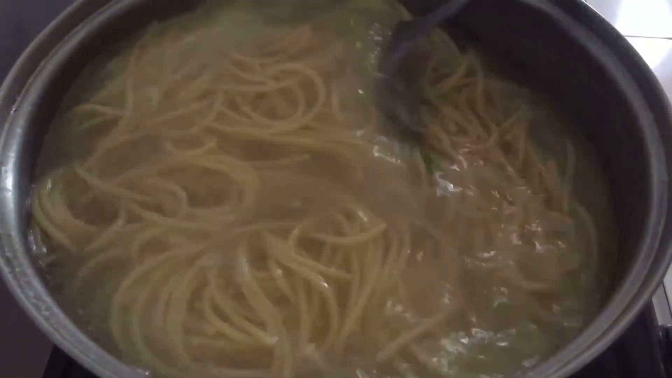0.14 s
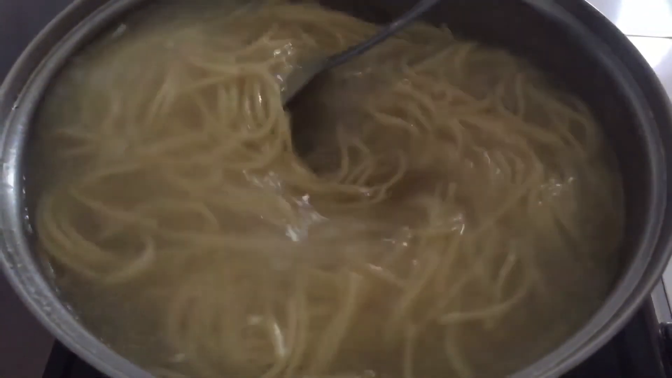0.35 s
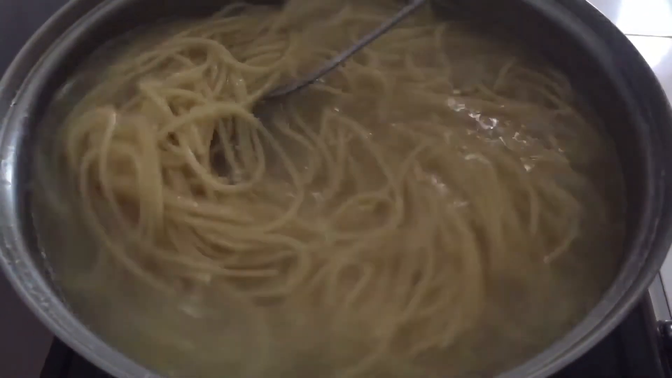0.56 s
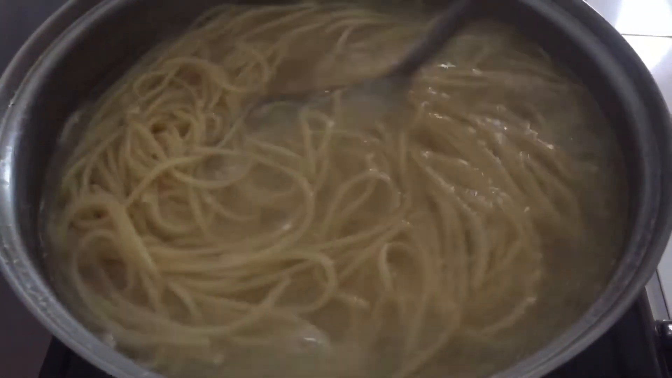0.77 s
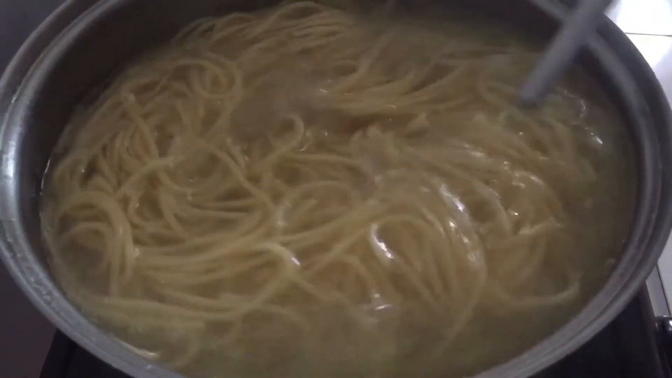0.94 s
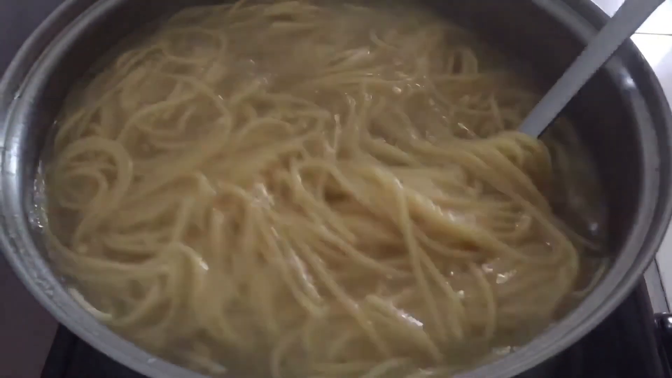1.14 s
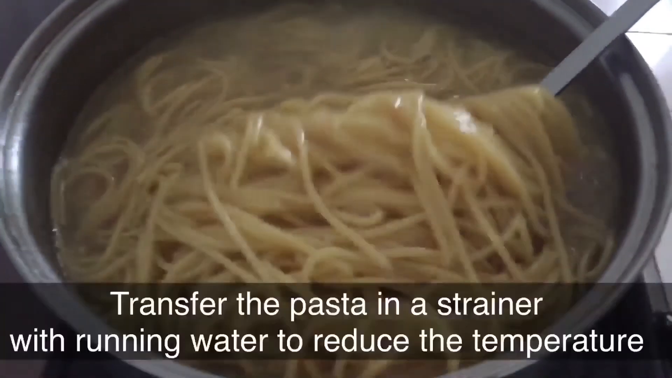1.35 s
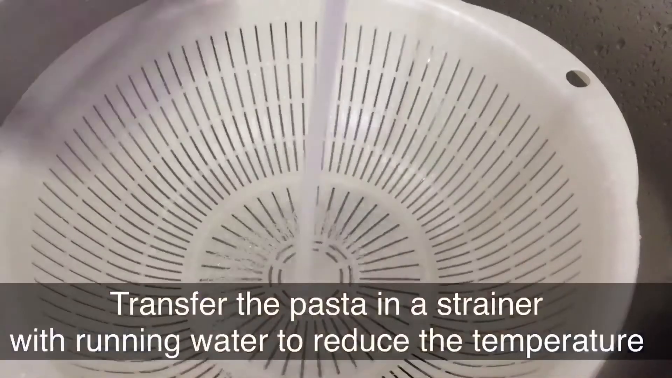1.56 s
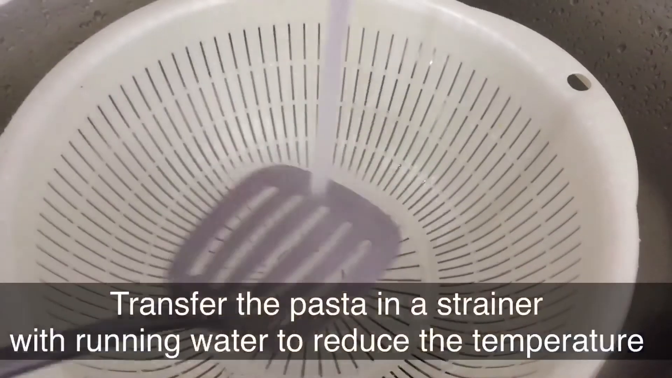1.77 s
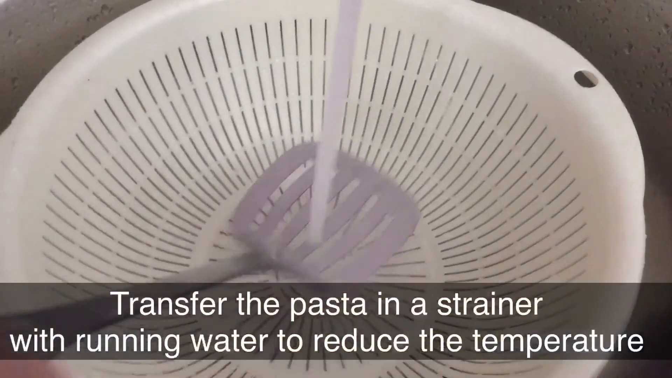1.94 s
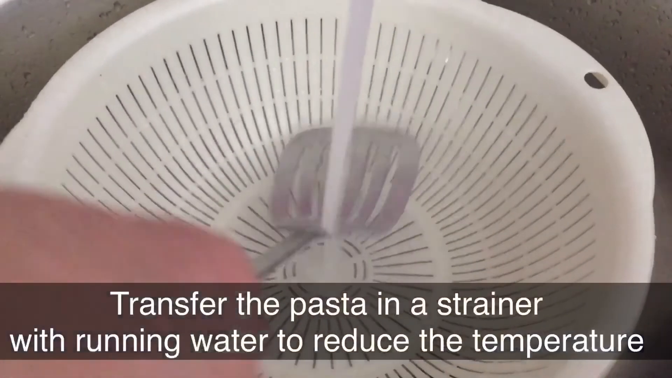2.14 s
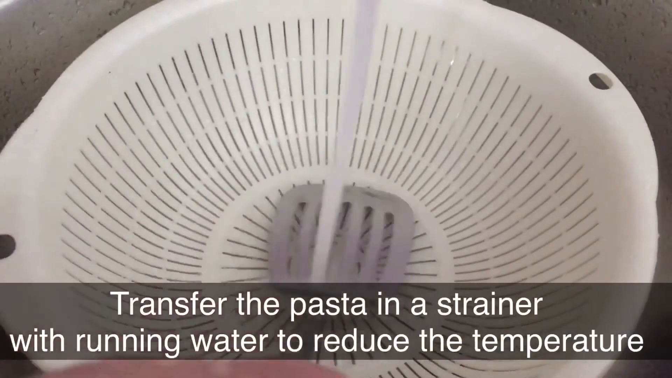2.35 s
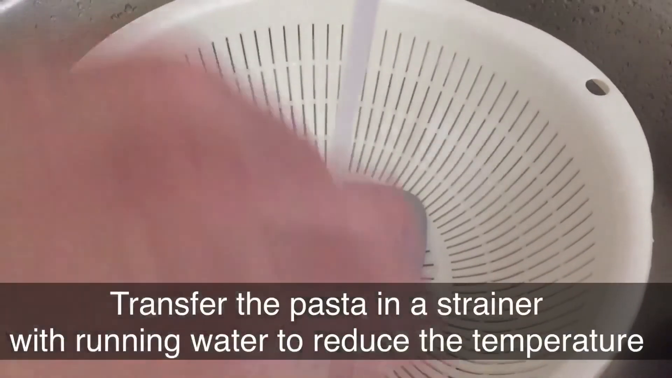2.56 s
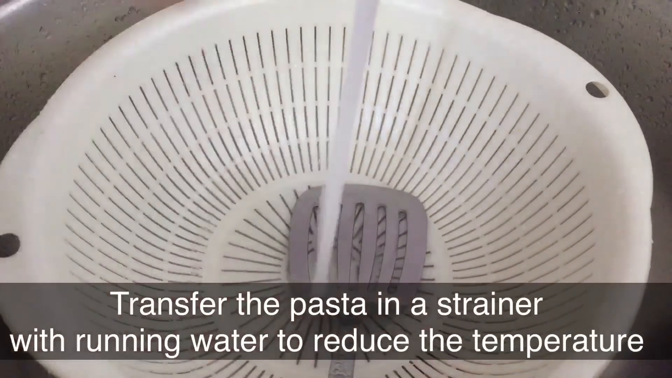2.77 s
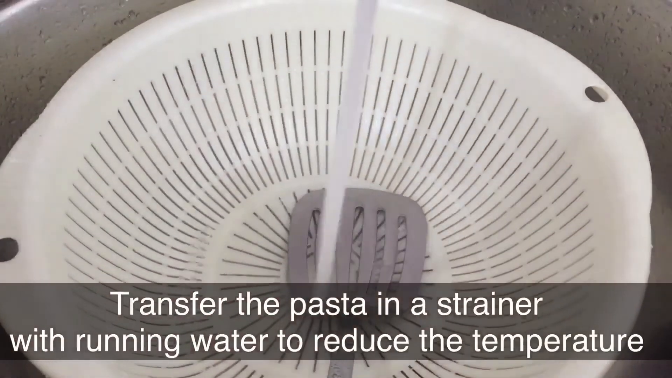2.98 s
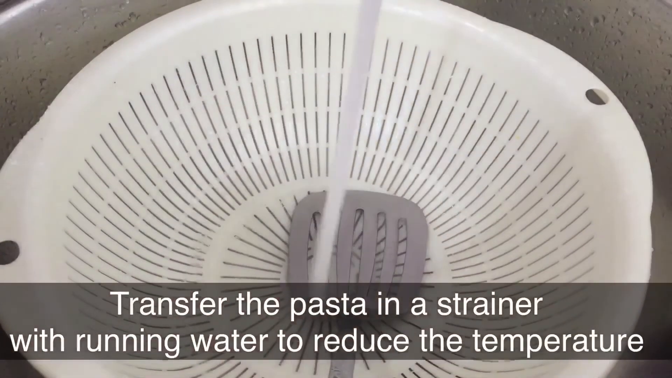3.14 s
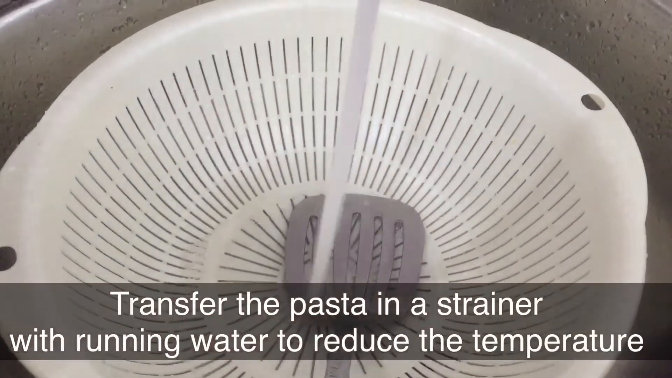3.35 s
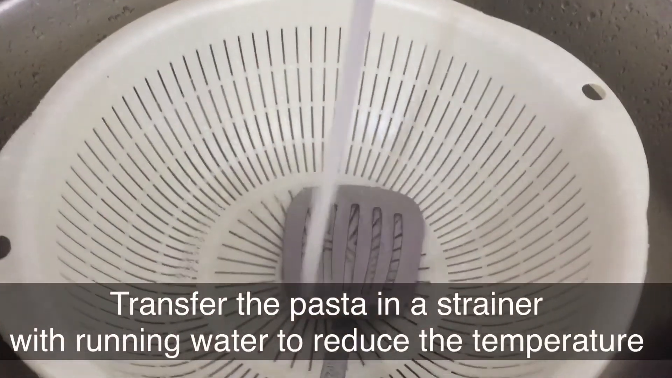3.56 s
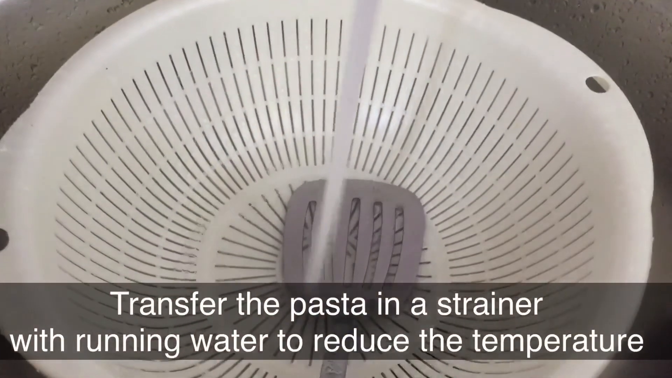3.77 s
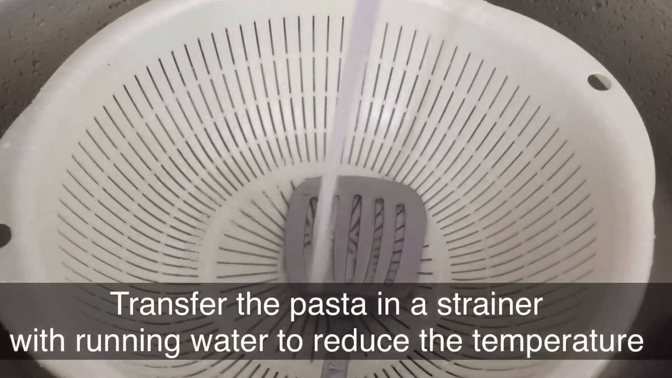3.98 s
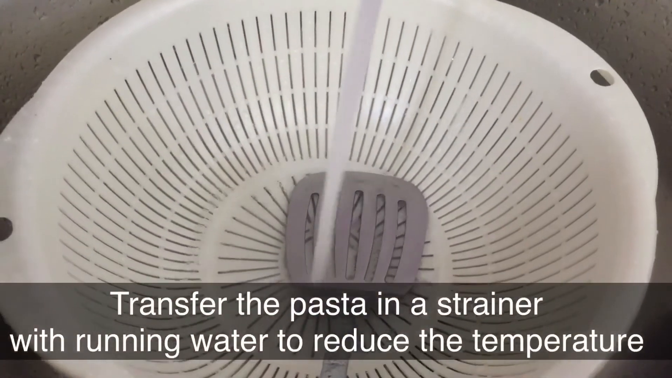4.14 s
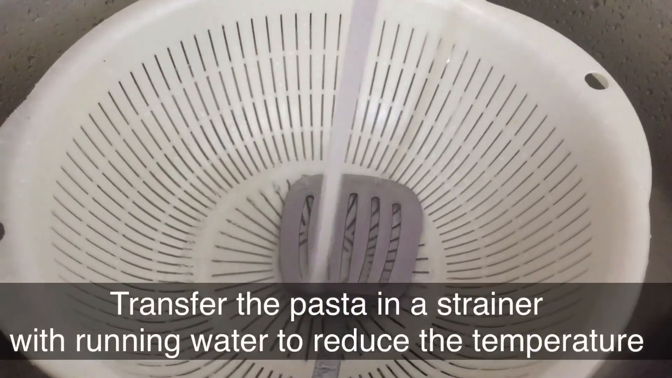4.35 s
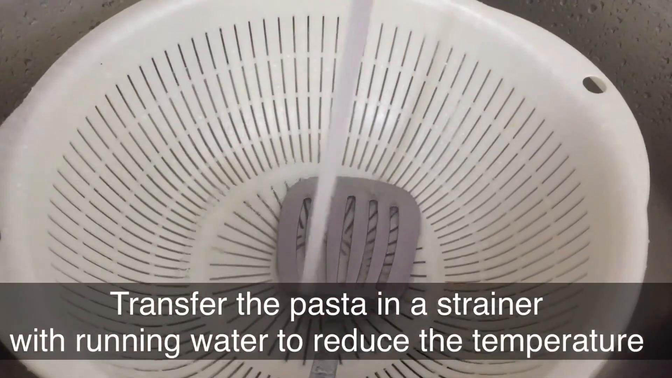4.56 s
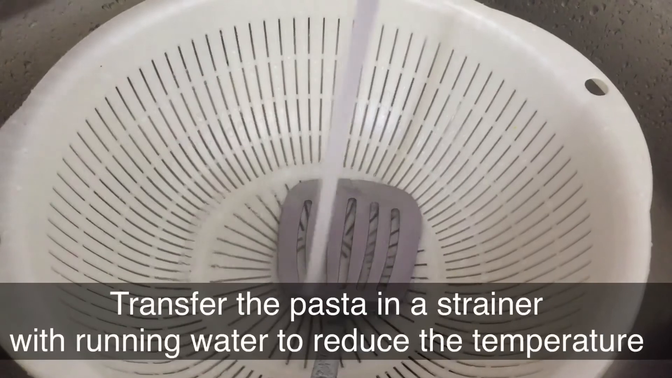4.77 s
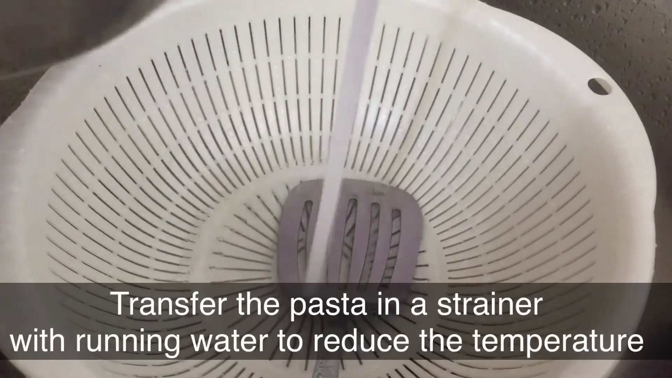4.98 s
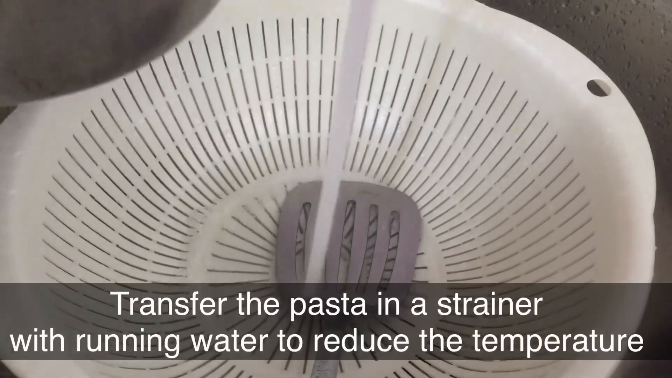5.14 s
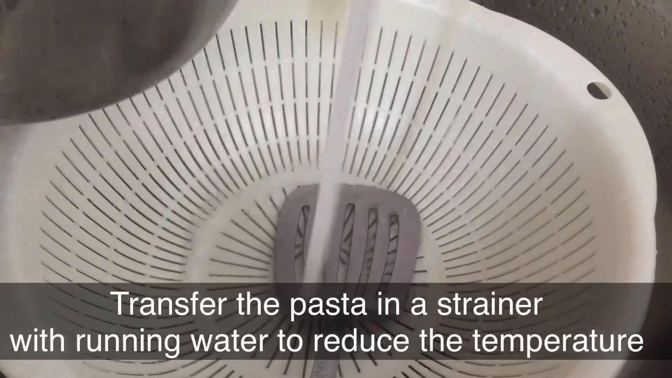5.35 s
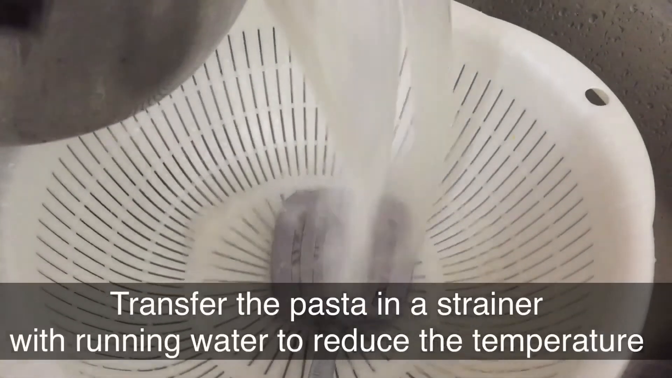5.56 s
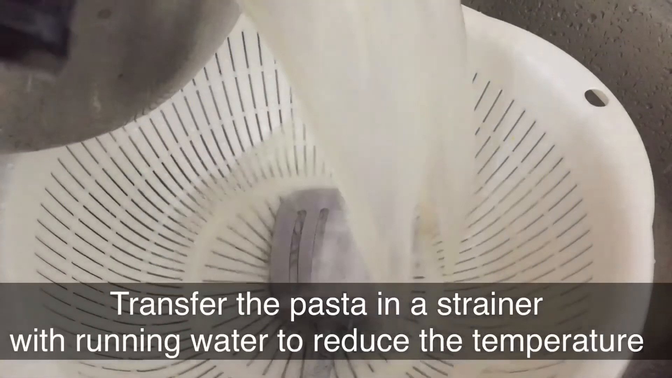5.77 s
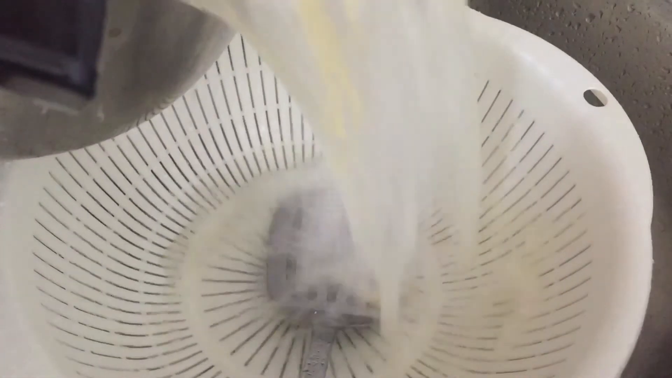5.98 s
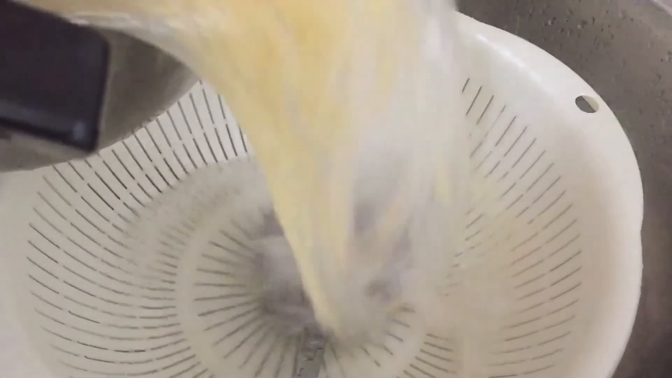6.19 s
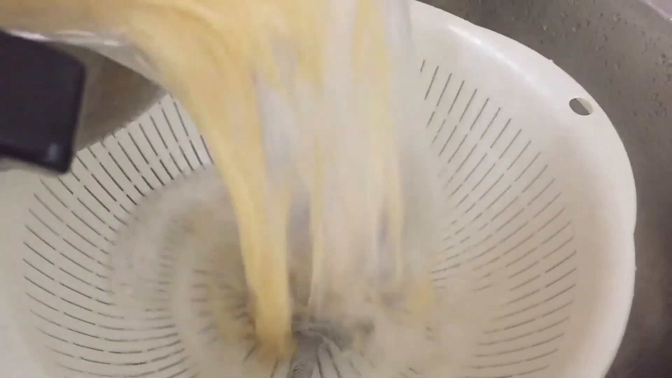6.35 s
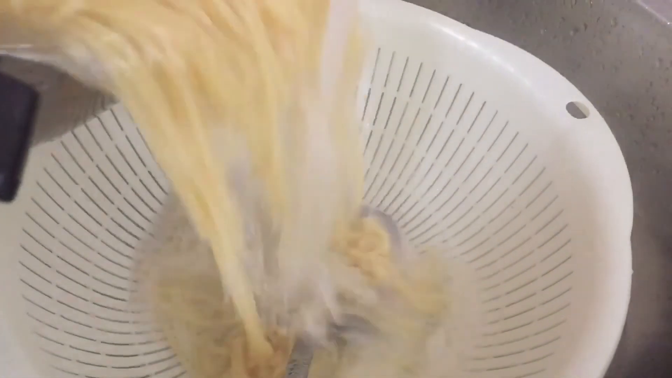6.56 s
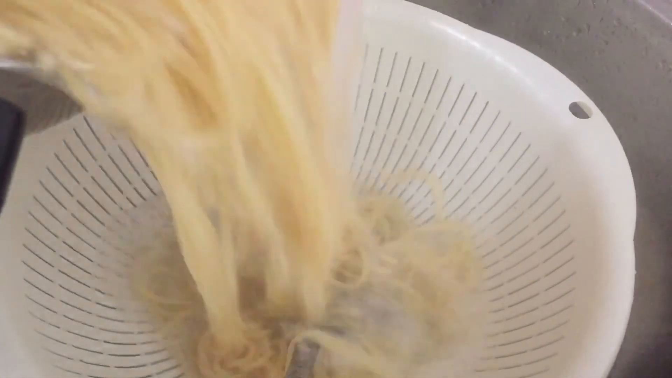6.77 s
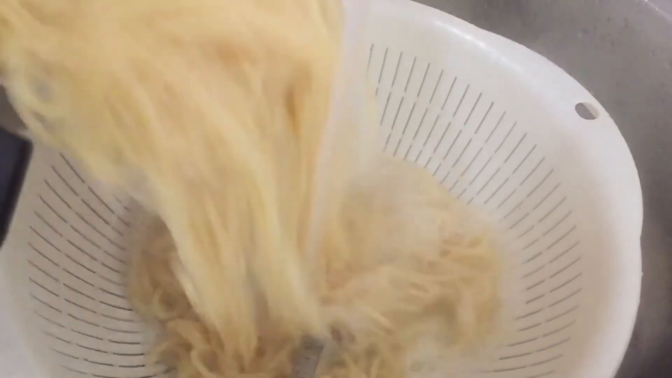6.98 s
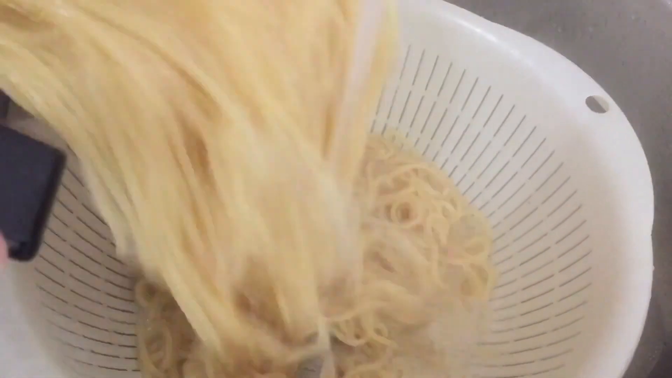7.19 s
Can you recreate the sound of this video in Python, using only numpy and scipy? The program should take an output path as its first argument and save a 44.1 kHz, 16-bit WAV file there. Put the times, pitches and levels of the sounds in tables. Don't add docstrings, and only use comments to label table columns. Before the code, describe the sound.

Soft pot stirring and drips give way to a bright running tap, a utensil clattering into a plastic strainer, then a heavy splashing pour.

```python
import sys
import numpy as np
from scipy import signal
from scipy.io import wavfile
from scipy.ndimage import uniform_filter1d

SR = 44100
rng = np.random.default_rng(int(sys.argv[2]) if len(sys.argv) > 2 else 0)


def inscribe(sig):
    pcm = np.round(np.clip(np.atleast_2d(sig).T, -1, 1) * 32767)
    wavfile.write(sys.argv[1], SR, pcm.astype(np.int16))


def invert_db(level):
    return 10 ** (np.asarray(level, dtype=float) / 20)


N = 318402
TIME = np.arange(N) / SR

# frequency_hz, density_db
STOVE_SPECTRUM = [(18, -69), (30, -17), (112, -13), (194, -9), (266, -22.5), (303, 36), (336, -17),
                  (394, -17.5), (526, -21), (569, -20.5), (1960, -31), (5040, -61), (5900, -25),
                  (6720, -49), (16000, -45.5)]
# frequency_hz, width_hz, level_db
HUM_RESONANCES = [(5960, 450, -66.5), (117.2, 5.1, -57), (304, 180, -53.5), (1490, 530, -59.5)]
# frequency_hz, level_db
FAN_TONES = [(301.5, -46.5), (387.6, -53.5)]
# start_s, end_s, frequency_hz, width_hz, level_db
STEAM_WHISTLES = [(0.038, .26, 2400, 130, -66), (0.56, 0.73, 3400, 130, -63), (1.24, 1.35, 3800, 150, -65),
                  (1.06, 1.1, 3700, 120, -68), (0.026, .3, 1600, 110, -72), (1.1, 2.1, 1300, 110, -64),
                  (1.3, 1.4, 1100, 76, -73), (0.42, 0.57, 2100, 200, -64), (.22, 0.37, 2300, 120, -60),
                  (.9, 1.3, 1800, 50, -81), (1.27, 1.42, 106, 17, -40)]
# start_s, level_db
STIRS = [
    (0, -60),
    (.225, -46.5),
    (.55, -74),
    (.72, -66),
    (.9, -58),
    (1.33, -54),
]
# start_s, peak_db, pitch_hz, ring_cycles
DRIPS = [(.121, -43, 624, 16), (.242, -35, 2400, 14), (.249, -32, 1500, 14), (.257, -30, 2700, 14),
         (.3085, -32, 5000, 20), (.45, -38, 805, 16), (.5, -38, 3300, 20), (.64, -45, 1410, 18),
         (.67, -42, 2300, 16), (.868, -37, 1960, 14), (1.029, -42, 1560, 18), (1.25, -50, 641, 16),
         (.2495, -31, 5200, 14), (.278, -38, 2480, 20), (0.3082, -19, 2470, 12), (0.309, -26, 1350, 21),
         (0.32, -27.5, 1120, 25), (.345, -33, 2100, 16), (.350, -26.5, 1720, 18), (0.371, -20.5, 3580, 11),
         (.437, -36, 4500, 15), (.468, -30, 2110, 28), (0.4805, -23, 3130, 29), (.585, -35.5, 2080, 33),
         (0.985, -28, 855, 29), (.986, -30, 2880, 15), (1.163, -37, 1900, 27), (1.166, -37, 1150, 18),
         (1.32, -43, 5000, 30), (1.42, -42, 4300, 45), (.987, -35, 2200, 14)]
# start_s, peak_db, pitch_hz
BUBBLE_TICKS = [(0.2339, -42, 7350), (0.2474, -44, 6760), (0.3704, -43, 8160), (0.3805, -34, 8330),
                (0.4369, -50, 6600), (0.4589, -43, 13100), (0.4713, -40, 12300), (0.5157, -44, 8860),
                (0.5546, -49, 13000), (0.5726, -46, 14700), (0.6604, -45, 15400), (0.679, -50, 14300),
                (1.0565, -42, 12800), (1.0914, -51, 14000), (1.107, -39, 9390)]
# start_s, end_s
SCRAPE_SPAN = [0.706, 0.908]
# start_s, level_db
CATCHES = [
    (0.705, -62),
    (.735, -63),
    (.7646, -56),
    (0.837, -48),
    (.862, -56),
    (.91, -57),
]
# frequency_hz, width_hz, level_db
POT_WALL_MODES = [(1350, 1600, 16.5), (2380, 250, 1), (3600, 650, 7), (4670, 1300, 5), (5930, 450, 1),
                  (6600, 360, 9), (8500, 460, -8), (9450, 500, 1), (11100, 600, -10), (12600, 600, -8)]
# start_s, end_s, frequency_hz, width_hz, level_db
SQUEALS = [(.715, .74, 1430, 200, -53), (.715, .75, 2350, 250, -58), (.72, .76, 8500, 250, -60),
           (.74, .795, 6850, 200, -56), (.77, .8, 6000, 300, -57), (.88, .91, 3600, 220, -58),
           (.845, .86, 2400, 300, -57), (.84, .91, 4700, 200, -59), (.87, .91, 5900, 180, -57),
           (.85, .9, 9500, 300, -63)]
# out_start_s, out_end_s, in_start_s, in_end_s
FADE_CORNERS = [1.27, 1.45, 1.486, 1.601]
# time_s, plunge into standing water 0-1, pour from the pot 0-1, noodles softening the fall 0-1
SINK_STATE = [(1.6, 0.9, 0.15, 0.5), (1.72, 1, 0.52, 0.4), (1.88, 0.85, 0.3, 0.2), (1.92, 0.52, 0.14, 0.1),
              (2.35, 0.72, 0.65, 0.2), (2.5, 0.7, 0, 0.24), (2.9, 0.22, 0.24, 0), (5.605, 0.21, 0.29, 0.07),
              (5.615, 0.6, 0.92, 0.1), (6.24, 0.9, 0.78, 0.48), (6.29, 0.86, 0.71, 0.86),
              (6.6, 0.99, 1, 0.56), (6.9, 0.7, 0.89, 0.63), (6.93, 1, 0.69, 1), (7.18, 0.8, 0.91, 0.7),
              (7.22, 0.6, 0.85, 1)]
# tap_alone_db, full_plunge_gain_db, full_pour_gain_db, full_noodles_gain_db
WATER_LAYERS = [
    (-25.5, 1, 3, -3),
    (-33, 2.5, 6.5, -1.5),
    (-49, 14, 0, 0.5),
    (-43, 7.5, 4, -7),
]
LAYER_SPLITS = [420, 1600, 4500]
# start_s, free_s, depth_db
CHOKES = [(1.89, 1.986, 4.5), (2.07, 2.292, 5.5), (2.287, 2.399, 5), (4.107, 4.176, 2.5), (4.226, 4.327, 2),
          (4.44, 4.63, 1.5), (5.778, 5.854, 1), (6.903, 6.926, 5.5)]
# start_s, rumble_gain_db
SHAKES = [
    (2.405, 12),
    (2.64, 15),
    (6.455, 9),
]
# start_s, hold_s, depth_db
DUCKS = [
    (2.65, 0.16, 2.8),
    (6.46, 0.074, 2.2),
]
# frequency_hz, density_db
JET_SPECTRUM = [(18, -40), (30, -8.5), (70, 2.5), (118, -3.5), (141, -6), (189, 0), (374, -15),
                (449, -11.5), (632, -9), (889, -15), (1960, -11.5), (3980, -5), (5310, -9.5), (12600, -4.5),
                (16000, -15)]
# frequency_hz, width_hz, level_db
BOWL_RESONANCES = [(67.5, 23, 0), (111, 4.5, 13.5), (194, 17, 2), (288, 61, 1), (370, 75, 3.5),
                   (530, 30, -6), (640, 115, -8.5), (1230, 15, -0.5), (1794, 340, -0.5), (3050, 42, -5.5),
                   (3700, 84, -5), (4370, 530, 1.5), (5340, 240, 3), (5580, 110, -8), (6200, 150, 0),
                   (6760, 110, -5), (9490, 160, -4.5)]
# start_s, peak_db, pitch_hz
SLAPS = [(1.526, -21, 5500), (1.582, -10, 3750), (1.696, -5, 4360), (1.872, -3, 4700), (1.993, -8, 3920),
         (2.025, -9, 8600), (2.144, -6.5, 5300), (2.294, -19, 5070), (3.148, -6.5, 5200),
         (3.2445, -24, 6550), (4.177, -10, 5270), (4.355, -8.5, 8600), (4.623, -8, 5130),
         (4.82, -6.5, 4200), (5.144, -15, 6040), (5.336, -14, 5200), (5.448, -8, 6140), (5.513, -6, 6730),
         (5.614, -3.5, 6700), (5.672, -2, 6250), (5.727, -2.5, 3600), (5.7524, -4.5, 6600),
         (5.7913, -1.5, 6140), (5.943, -3.5, 3600), (5.974, -3, 3100), (6.03, -1, 5960), (6.122, 0.5, 6860),
         (6.836, -2.5, 5960), (6.918, -3.5, 2190), (6.958, -3, 3060)]
# start_s, peak_db, pitch_hz
MORE_SLAPS = [(2.9047, -7, 6260), (2.9347, -8, 6940), (3.003, -10, 10100), (3.192, -13, 5660),
              (3.277, -11, 5040), (3.348, -10, 8200), (3.5582, -9, 6300), (3.671, -13, 5260), (3.787, -16, 6240),
              (3.9404, -10, 3300), (3.9853, -25, 4140), (4.242, -18, 5140), (4.374, -17, 4370),
              (4.6536, -17, 5500), (4.93, -9, 5200), (5.179, -7, 11100), (5.2823, -19, 5330), (5.764, -11, 3960),
              (5.8265, -3.5, 6160), (5.9403, -5, 8800), (5.9725, -13, 9000), (6.1696, -1.5, 3220),
              (6.216, -4.5, 6570), (6.249, -5.5, 7000), (6.4295, -4, 2060), (6.6854, -19, 3470)]
# start_s, peak_db, pitch_hz
GLUGS = [(3.013, -38, 586), (3.136, -21, 1450), (3.276, -25, 1380), (3.447, -35, 1230), (4.929, -35, 730),
         (5.054, -33, 1430), (5.44, -27, 790), (5.667, -26, 1400), (5.791, -40, 1300), (5.947, -19, 1020),
         (6.003, -29, 1280), (6.09, -17, 980), (6.11, -16, 970), (6.159, -16, 1000), (6.212, -20.5, 780),
         (6.301, -25, 1450)]
# start_s, peak_db, pitch_hz, length_s, rise (ratio)
SMACK = [
    (5.858, 7, 3050, .0095, 1.5),
]
# start_s, peak_db, pitch_hz, length_s
GURGLES = [(1.869, -23, 1190, 0.037), (3.045, -18.5, 1840, 0.021), (4.416, -19, 1860, 0.016),
           (5.634, -11, 2470, 0.016), (5.868, -14, 3140, 0.018), (6.03, -10.5, 3180, 0.013),
           (6.127, -14.5, 2070, 0.019), (6.2042, -4, 2100, 0.008), (6.205, -6.5, 2540, 0.017),
           (6.281, -13, 3110, 0.026), (6.318, -9, 2970, 0.016), (6.554, -15, 3300, .016),
           (6.61, -13, 2590, 0.014), (6.647, -19, 2570, .018), (6.755, -25, 2400, 0.02),
           (6.78, -15, 2340, 0.024), (7.09, -18, 3520, .014), (6.826, -11, 3200, 0.013),
           (6.918, -10, 1110, 0.011), (6.936, 4, 765, 0.0038), (7.131, -13, 1160, 0.026),
           (7.146, -10, 1260, 0.019), (7.147, -6, 3520, 0.01), (7.163, -9.5, 1470, 0.014),
           (7.164, -16, 3050, 0.016)]
# start_s, peak_db
NEEDLES = [(1.6971, -15), (1.9929, -5), (2.2962, -11), (2.403, -11), (2.5934, -16), (2.624, -9),
           (2.6394, 3.5), (3.0031, -12), (3.0635, -14), (3.2446, -12), (3.2777, -9), (3.6701, -12),
           (3.986, -10), (4.1784, -7), (4.2192, -7), (4.242, -11), (4.3546, -13), (5.3352, -5.5),
           (5.4461, -8), (5.6701, -14), (5.792, -8), (5.8217, -7), (5.9405, -7), (5.9724, -13),
           (6.1245, -4), (6.2054, -10), (6.5396, -11), (6.7254, -5.5), (6.8344, -10), (6.9601, -18)]
# frequency_hz, width_hz, share (0-1)
REFLECTION_DIPS = [(475, 70, 0.38), (960, 55, 0.16), (3980, 170, 0.43), (4670, 660, 0.36), (7840, 350, .33)]
# start_s, end_s, frequency_hz, width_hz, level_db
DRAIN_GULPS = [(1.51, 1.7, 113, 15, -39.5), (3.13, 3.18, 377, 25, -42.5), (5.41, 5.5, 813, 50, -44),
               (7.11, 7.3, 110, 18, -36), (6.31, 6.40, 640, 90, -48), (6.63, 6.82, 612, 85, -38.5)]
# start_s, level_db, hardness (0-1)
TOUCH_BLOWS = [
    (2.4038, -9.5, 0.93),
    (2.411, 5.5, 0),
]
# frequency_hz, level_db, t60_s
BOWL_MODES = [(108.5, -13, 0.31), (204, -11, 0.14), (270, -5.5, 0.069), (393, -8, 0.047), (1630, 5, 0.036),
              (2340, -10, 0.18), (3600, 9, .02), (5250, -2, .04)]
# start_s, level_db, hardness (0-1)
DROP_BLOWS = [(2.639, -1, 1), (2.642, -2, 0.65), (2.6465, -5.5, 0.88), (2.652, -6.5, 0.66),
              (2.659, -2, 0.3), (2.665, -12, 0.4), (2.679, -6.5, 0.5), (2.69, 7, 0), (2.701, -29, 0.3),
              (2.761, -16, 0.6)]
# frequency_hz, level_db, t60_s
TURNER_MODES = [(340, -14, 0.1), (417, -8, 0.09), (636, -12, 0.17), (700, -17, 0.08), (965, -14, .15),
                (1245, -14, .15), (1378, -8, 0.2), (1498, -4, .12), (1580, -4, 0.07), (1702, -4, 0.16),
                (1957, -11, 0.15), (2380, -14, 0.084), (2680, -13, .1), (3025, -6, 0.15), (3190, -3, .11),
                (3303, -7, .16), (3725, -10, 0.14), (4160, -15, 0.1), (4800, -15, .1), (6400, -13, .08)]
# start_s, level_db, hardness (0-1)
THUD_BLOWS = [
    (2.640, 2.5, 0.03),
    (2.6505, -0.5, 0),
]
# frequency_hz, level_db, t60_s
FLOOR_MODES = [(56, -4, .2), (111, -3, 0.3), (195, -3, .3), (217, -2, 0.18), (265, -2, 0.22),
               (320, -10, .2), (366, 1.5, 0.28), (1700, -9, .3), (3197, -12, 0.3)]
# start_s, level_db, hardness (0-1)
BUMP_BLOWS = [
    (6.4541, 0, 0.46),
    (6.4665, -16, 0.3),
    (6.482, -20, 0.1),
]
# frequency_hz, level_db, t60_s
RIM_MODES = [(75, -12, 0.1), (110, -9, 0.3), (194.7, -4, 0.3), (250, 4, 0.07), (368, -4, 0.12),
             (645, 12, 0.045), (690, -8, 0.2), (896, 2, 0.09), (1080, -1, 0.04)]


def unit(x):
    return x / np.sqrt(np.mean(x ** 2) + 1e-20)


def curve(rows):
    s, *columns = np.transpose(rows)
    return [np.interp(TIME, s, c) for c in columns]


def decay(x, seconds):
    return signal.lfilter([1], [1, -np.exp(-1 / (seconds * SR))], x + 1e-18)


def strokes(rows, seconds):
    clicks = np.zeros(N)
    for s, size in rows:
        clicks[round(s * SR)] += size
    return decay(clicks, seconds)


def drift(rate):
    r = np.exp(-80 * np.pi * rate / SR)
    slow = signal.lfilter([1], [1, -2 * r, r * r], rng.standard_normal(N // 40 + 2002))[2000:]
    return np.interp(np.arange(N) / 40, np.arange(len(slow)), unit(slow))


def wander(depth_db):
    return invert_db(depth_db * drift(12))


def resonance(x, hz, width):
    r = np.exp(-np.pi * width / SR)
    return signal.lfilter([(1 - r * r) / 2, 0, (r * r - 1) / 2], [1, -2 * r * np.cos(2 * np.pi * hz / SR), r * r], x)


def ring(clicks, hz, t60):
    r, w = invert_db(-60 / (t60 * SR)), 2 * np.pi * hz / SR
    return signal.lfilter([0, np.sin(w)], [1, -2 * r * np.cos(w), r * r], clicks + 1e-18)


def bands(spectrum):
    edges, white = 30 * 2 ** (np.arange(28) / 3), rng.standard_normal((2, N))
    hz_points, db_points = np.transpose(spectrum)
    for k, (low, high) in enumerate(zip(edges, np.append(edges[1:], 19000))):
        band = signal.sosfilt(signal.butter(2, [low, high], "band", fs=SR, output="sos"), white[k % 2])
        hz = np.sqrt(low * high)
        yield hz, band * invert_db(np.interp(np.log(hz), np.log(hz_points), db_points))


def narrow(hz, width):
    return unit(resonance(resonance(rng.standard_normal(N), hz, width), hz, width))


def swells(rows):
    out = np.zeros(N)
    for start, end, hz, width, db in rows:
        t = np.arange(round((end - start + .034) * SR)) / SR
        noise = rng.standard_normal(len(t) + 4000)
        tone = unit(resonance(resonance(noise, hz, width), hz, width)[4000:])
        shape = np.clip(np.minimum(t / 0.037, (t[-1] - t) / 0.044), 0, 1)
        add(out, start - .02, invert_db(db) * tone * shape)
    return out


def impacts(per_s, spread_db, seconds):
    sizes = invert_db(spread_db * np.minimum(rng.exponential(1, N), 4))
    hits = sizes * (rng.random(N) < per_s / SR)
    return unit(decay(decay(hits, seconds), 0.3 * seconds))


def plop(peak_db, hz, seconds, rise, tone, noisy, spread, swell=0.26):
    t = np.arange(3000) / SR
    bubble = np.sin(2 * np.pi * hz * t * (1 + rise * t / seconds))
    bubble *= invert_db(-60 * t / seconds) * np.minimum(t * hz / 2.0, 1)
    splash = rng.standard_normal(len(t)) * invert_db(-60 * t / (4.8 * seconds)) * np.minimum(t / (swell * seconds), 1)
    splash = resonance(resonance(splash, hz, spread * hz), hz, 2.8 * spread * hz)
    return invert_db(peak_db) * (tone * bubble + noisy * splash)


def add(track, s, sound):
    i = round(s * SR)
    track[i:i + len(sound)] += sound[:N - i]


def stove_air():
    air = unit(sum(band * invert_db(2.5 * drift(5.0)) for hz, band in bands(STOVE_SPECTRUM)))
    out = invert_db(-48) * air
    out += sum(invert_db(db) * narrow(hz, width) for hz, width, db in HUM_RESONANCES)
    for hz, db in FAN_TONES:
        phase = 2 * np.pi * np.cumsum(hz + 1.5 * drift(5)) / SR
        out += invert_db(db + 2.5 + 1.2 * drift(9)) * np.sin(phase)
    return out


def lapping():
    rest_db, rise_s, die_s = -64.5, 0.016, 0.089
    laps = (.7 + impacts(300, 1.2, .004)) * rng.standard_normal(N)
    laps = resonance(resonance(laps, 1380, 2500), 1500, 3100)
    stirs = [(s, invert_db(db)) for s, db in STIRS]
    return (invert_db(rest_db) + strokes(stirs, die_s) - strokes(stirs, rise_s)) * unit(laps)


def steam():
    return swells(STEAM_WHISTLES) * invert_db(2.0 * drift(23))


def pot_drops():
    out = np.zeros(N)
    for s, db, hz, cycles in DRIPS:
        add(out, s, plop(db, hz, cycles / hz, rise=0.047, tone=1.18, noisy=0.41, spread=0.4))
    for s, db, hz in BUBBLE_TICKS:
        add(out, s, plop(db, hz, 31.0 / hz, rise=.1, tone=.3, noisy=0.93, spread=0.61))
    return out


def scrape():
    drag_db, attack_s, release_s, catch_die_s, squeal_db = -50, 0.037, 0.031, 0.0048, 10.5
    grit = (2.2 + impacts(450, 2.0, .0012)) * rng.standard_normal(N)
    wall = 0.58 * resonance(grit, 5500, 9600)
    wall += sum(invert_db(db) * wander(1.3) * resonance(grit, hz, width) for hz, width, db in POT_WALL_MODES)
    start, end = SCRAPE_SPAN
    drag = invert_db(drag_db) * np.interp(TIME, [start, start + attack_s, end, end + release_s], [0, 1, 1, 0])
    bites = strokes([(s, invert_db(db)) for s, db in CATCHES], catch_die_s)
    squeals = swells([(*row, db + squeal_db) for *row, db in SQUEALS]) * invert_db(2.0 * drift(23))
    return invert_db(7.0) * (drag + bites) * unit(wall) + squeals


def water_levels():
    burst_share, burst_die_s = 0.97, 0.013
    fall_s, rise_s, shake_die_s = 0.064, 0.031, .11
    slop_choke = 0.3
    state = curve(SINK_STATE)
    choke = sum(db * np.interp(TIME, [a, b, b + 0.0025], [0, 1, 0]) for a, b, db in CHOKES)
    burst = burst_share * strokes([(free, db) for start, free, db in CHOKES], burst_die_s)
    duck = np.zeros(N)
    for s, hold, db in DUCKS:
        duck += db * np.interp(TIME, [s, s + fall_s, s + hold, s + hold + rise_s], [0, 1, 1, 0])
    levels = [db + np.dot(gains, state) + burst - choke - duck for db, *gains in WATER_LAYERS]
    levels[2] = levels[2] - slop_choke * uniform_filter1d(choke, size=2000)
    levels[3] = levels[3] + choke - burst + strokes(SHAKES, shake_die_s)
    return levels


def water(levels):
    everywhere = impacts(70, 0.34, 0.0019)
    nearby = [impacts(260, 4.5, .0013) for k in range(10)]
    layers, (plunge, pour, noodles) = np.zeros((4, N)), curve(SINK_STATE)
    dulling, brightening = 9 * noodles, 5.5 * plunge
    for k, (hz, band) in enumerate(bands(JET_SPECTRUM)):
        grainy = np.interp(np.log(hz), np.log([300, 2000]), [.1, 1])
        bursts = 1 + grainy * (0.35 * everywhere + 0.33 * nearby[k // 3])
        layer = 3 - np.searchsorted(LAYER_SPLITS, hz)
        tilt_db = [-dulling * np.log2(hz / 7500), 0, brightening * np.log2(hz / 900), 0][layer]
        layers[layer] += band * bursts * invert_db(tilt_db + 1.33 * drift(9.0))
    bare = layers.copy()
    for hz, width, db in BOWL_RESONANCES:
        k = 3 - np.searchsorted(LAYER_SPLITS, hz)
        damped_db = db - 13.0 * noodles * (hz > 3500)
        layers[k] += invert_db(damped_db) * wander(3.2) * resonance(bare[k], hz, width)
    return sum(invert_db(db) * unit(x) for x, db in zip(layers, levels))


def bubbles(levels):
    sizes = invert_db(0.63 * np.minimum(rng.exponential(1, N), 4)) * rng.choice([-1, 1], N)
    born = rng.random(N) < 600 * invert_db(4 * drift(12)) / SR
    pitches, dealt = np.geomspace(2000, 3900, 14), rng.integers(0, 14, N)
    rings = sum(ring(sizes * born * (dealt == k), hz, 31.0 / hz) for k, hz in enumerate(pitches))
    plunge, pour, noodles = curve(SINK_STATE)
    share_db = -13.5 + pour * (8.5 + 5.5 * noodles)
    out = invert_db(levels[1] + share_db) * unit(resonance(rings, 3200, 2800))
    for s, db, hz in SLAPS + MORE_SLAPS:
        add(out, s, plop(db - 5.5, hz, 0.014, rise=0.04, tone=0.74, noisy=1.15, spread=0.67, swell=0.29))
    for s, db, hz in GLUGS:
        add(out, s, plop(db - 0.5, hz, 44 / hz, rise=0.046, tone=0.57, noisy=0.52, spread=.4))
    for s, db, hz, seconds, rise in SMACK:
        add(out, s, plop(db, hz, seconds, rise, tone=0.9, noisy=0.4, spread=0.7))
    for s, db, hz, seconds in GURGLES:
        add(out, s, plop(db, hz, seconds, rise=.12, tone=1.0, noisy=.4, spread=.6))
    return out


def crackle(levels):
    per_s, crackle_db, slap_snap_db = 83, -10, 21.5
    lag_s = 0.0024
    snaps = invert_db(4.5 * np.minimum(rng.exponential(1, N), 4)) * (rng.random(N) < per_s / SR)
    for start, free, db in CHOKES:
        snaps[round(free * SR)] = invert_db(-5.0 + 2.0 * db)
    for s, db, hz in SLAPS + MORE_SLAPS:
        snaps[round((s + lag_s) * SR)] = invert_db(slap_snap_db + db)
    snaps = decay(snaps, 0.00083) * rng.choice([-1, 1], N)
    return invert_db(levels[0] + crackle_db) * unit(resonance(snaps, 8300, 13000))


def needles():
    clicks = np.zeros(N)
    for s, db in NEEDLES:
        clicks[round(s * SR)] = invert_db(db + 3)
    return ring(clicks, 11000, .003) * (.8 + .3 * rng.standard_normal(N))


def basin(x):
    for hz, width, share in REFLECTION_DIPS:
        x = x - share * resonance(x, hz, width)
    t = np.arange(4000) / SR
    echo = rng.standard_normal(len(t)) * invert_db(-60 * t / 0.14) * (t > .001)
    echo = resonance(echo, 5000, 9000)
    return x + invert_db(-15) * signal.fftconvolve(x, echo / np.linalg.norm(echo))[:N]


def knocks(blows, modes, body_db, crack_db, tail_s, contact_s):
    out, crack = np.zeros(N), np.zeros(N)
    chance = rng.normal(0, 1, (len(blows), len(modes)))
    start_s, level_db, hard = np.transpose(blows)
    at = [round(s * SR) for s in start_s]
    for (hz, db, t60), luck in zip(modes, chance.T):
        clicks = np.zeros(N)
        softness_db = 14.4 * (1 - hard) * np.log2(1 + hz / 800)
        clicks[at] = invert_db(level_db + db + 1.5 * luck - softness_db)
        out += ring(clicks, hz, t60)
    crack[at] = invert_db(level_db + crack_db) * hard
    noise = rng.standard_normal(N)
    bright = resonance(noise, 2900, 5900) * decay(crack, 0.004)
    bright = decay(bright, contact_s) / (contact_s * SR + 1) * 2
    dull = resonance(noise, 1500, 1080) * decay(crack, tail_s)
    out = decay(out, contact_s) / (contact_s * SR)
    whole = invert_db(body_db) * out + bright + .55 * dull
    return signal.sosfilt(signal.butter(2, 50, "high", fs=SR, output="sos"), whole)


def scene():
    stove = stove_air() + lapping() + steam() + pot_drops() + scrape()
    levels = water_levels()
    sink = basin(water(levels) + bubbles(levels)) + swells(DRAIN_GULPS)
    sink += crackle(levels) + needles()
    sink += knocks(TOUCH_BLOWS, BOWL_MODES, body_db=-19.5, crack_db=1.5, tail_s=0.013, contact_s=.00003)
    sink += knocks(DROP_BLOWS, TURNER_MODES, body_db=-10.0, crack_db=-1.5, tail_s=0.036, contact_s=.00003)
    sink += knocks(THUD_BLOWS, FLOOR_MODES, body_db=-13.5, crack_db=-40, tail_s=0.02, contact_s=.00003)
    sink += knocks(BUMP_BLOWS, RIM_MODES, body_db=-7.5, crack_db=-5.0, tail_s=0.022, contact_s=0.00019)
    first = np.interp(TIME, FADE_CORNERS[:2], [1, 0])
    second = np.interp(TIME, FADE_CORNERS[2:], [0, 1])
    return (first * stove + second * sink)[None]


def roll_off(x):
    return signal.sosfilt(signal.butter(12, 16380, fs=SR, output="sos"), x)


def record(dry):
    x = signal.sosfilt(signal.butter(4, 42, "high", fs=SR, output="sos"), dry)
    x = x - 0.5 * resonance(x, 10500, 1030)
    x = signal.sosfilt(signal.ellip(10, .3, 60, 15690, fs=SR, output="sos"), x)
    mix = np.clip(x, -1, 1)
    return roll_off(mix)


dry = scene()
out = record(dry)
inscribe(out)
```